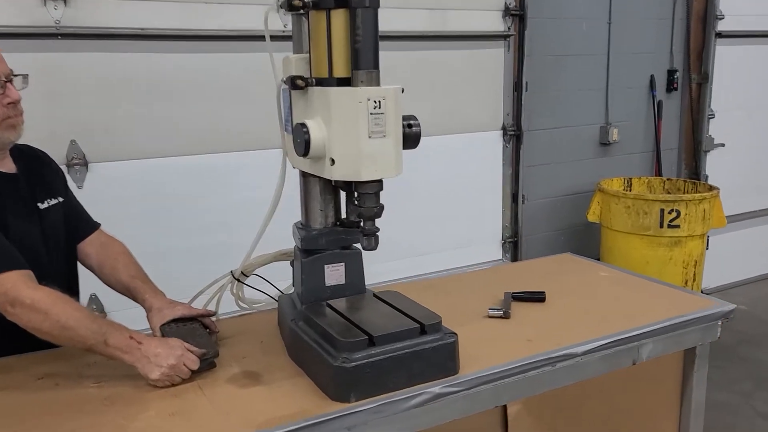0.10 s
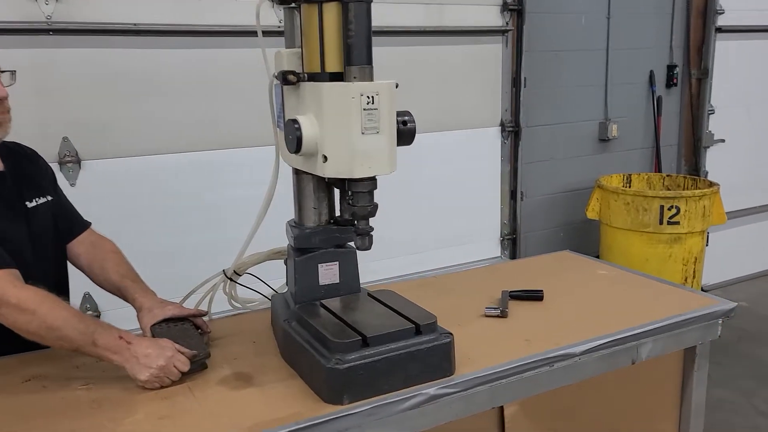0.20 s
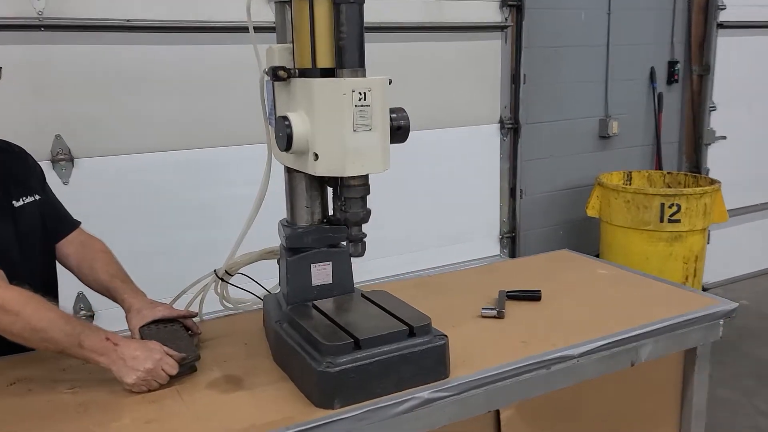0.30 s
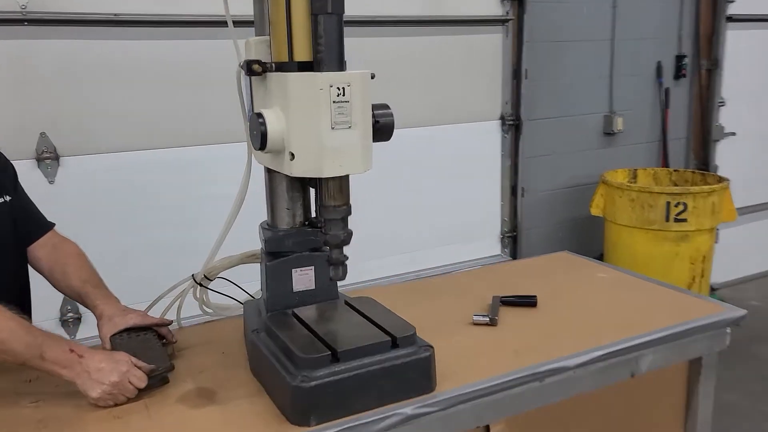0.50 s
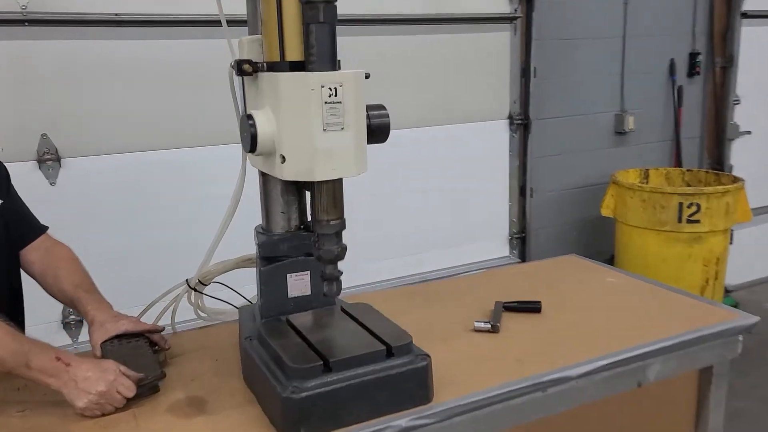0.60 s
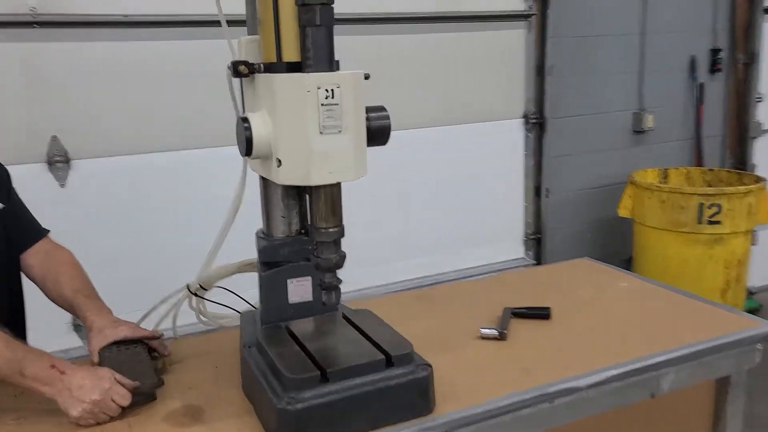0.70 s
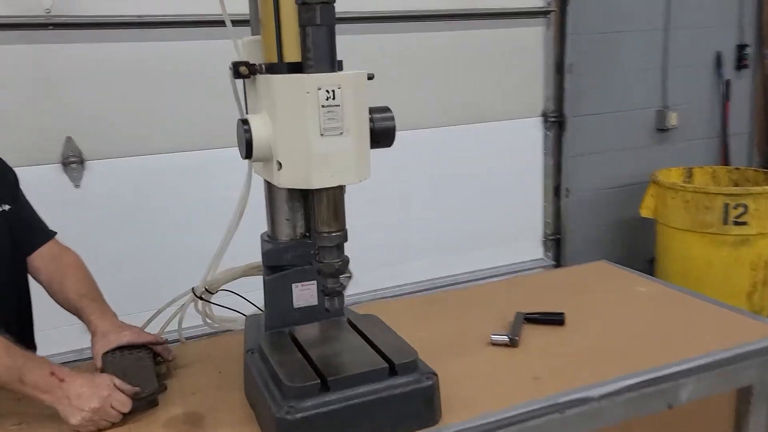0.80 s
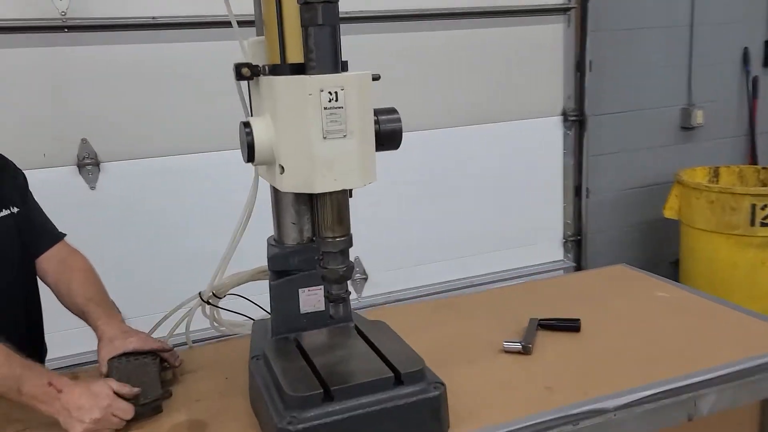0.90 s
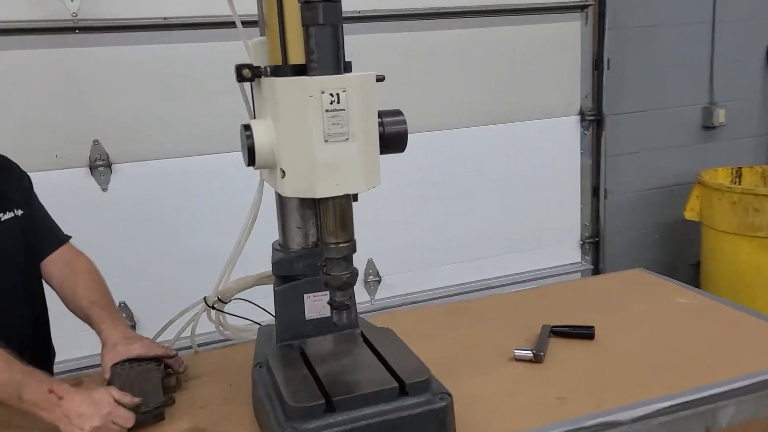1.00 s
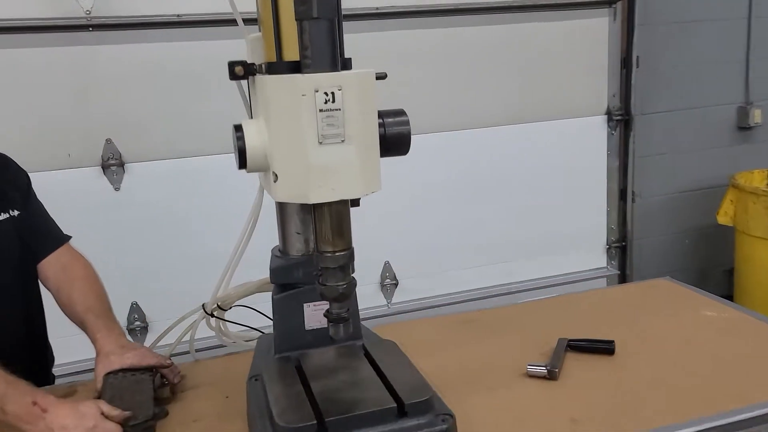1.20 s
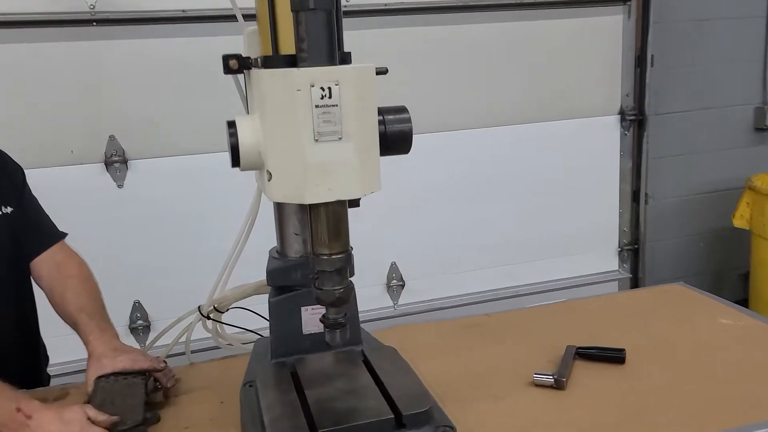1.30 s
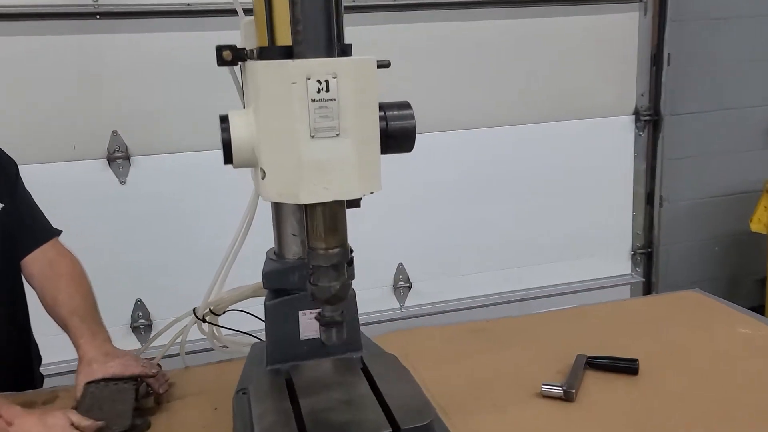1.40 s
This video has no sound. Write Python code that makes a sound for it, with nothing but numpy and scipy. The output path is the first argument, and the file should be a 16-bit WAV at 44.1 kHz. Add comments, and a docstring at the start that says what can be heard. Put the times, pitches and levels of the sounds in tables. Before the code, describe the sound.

A burst of compressed air and a dull thud from a pneumatic stamping press.

```python
"""A pneumatic stamping press makes one stroke on a bench in a large, hard-walled workshop.
At the stereo pair, the valve cracks open with a thin hiss, then air rushes out for two thirds of a
second, ringing the exhaust port, which points at the microphones. The ram lands with a dull, bouncing
thud and the hiss rings on in the hall over a low drone. A soft, dry knock follows, dead centre."""
import sys
import numpy as np
from scipy import signal
from scipy.fft import rfft, irfft
from scipy.io import wavfile

SR = 44100
rng = np.random.default_rng(int(sys.argv[2]) if len(sys.argv) > 2 else 0)


def master(y):
    """Save y as 16-bit WAV."""
    cut = np.clip(np.atleast_2d(y).T, -1, 1)
    pcm = np.round(cut * 32767)  # scale
    wavfile.write(sys.argv[1], SR, pcm.astype(np.int16))


N = 61740
TIME, HZ = np.arange(N) / SR, np.fft.rfftfreq(N, 1 / SR)

# room tone (frequency [Hz], relative level [dB])
ROOM_TONE = [(25, -7), (45, 1), (95, -3), (140, -6.5), (210, -1.5), (300, -29), (600, -25.5), (2000, -18.5),
             (6000, -32), (11000, -58), (15000, -64)]
# tones of the low drone (frequency [Hz], relative level [dB])
DRONE_TONES = [(95.2, 0), (124.5, -7)]
# low drone: motor hum, swelling near 1 s as the bench rumbles after the blow (time [s], level [dB])
DRONE_LEVEL = [(0, -49.5), (.14, -41.5), (.31, -45.5), (.37, -49.5), (.52, -42), (.8, -41.5), (.93, -37.5),
               (1.02, -35), (1.09, -48), (1.2, -44), (1.43, -46.5)]
# hiss of the previous stroke, still in the hall (frequency [Hz], relative level [dB])
LINGER_COLOUR = [(300, -1.5), (600, -16), (1000, 1.5), (2000, -1), (3000, -0.5), (4500, -5.5),
                 (7000, -17), (10000, -30), (12000, -47)]
# hall decay (frequency [Hz], t60 [s])
HALL_DECAY = [(150, 0.5), (500, 1.5), (1200, 2.2), (2300, 2.2), (4500, 2.2), (8000, 1.08), (12000, 0.66),
              (16000, 0.47)]
# strength of the reverberation (frequency [Hz], level [dB])
HALL_COLOUR = [(150, 8.5), (750, -3.5), (1200, 1), (1900, -2.5), (3000, -4), (5500, -4.5), (9000, -1.5),
               (12500, -5), (15500, -4)]
# likeness of the hall at the two microphones (frequency [Hz], correlation)
HALL_LIKENESS = [(150, 0.89), (650, .75), (950, 0.27), (1350, -0.65), (2100, 0.22), (4000, -0.11)]
# ring of the knock (frequency [Hz], relative level [dB], t60 [s])
KNOCK_RING = [(150, -3, .07), (270, -5, .025), (420, 0, .018), (1300, -12, .015)]
# modes of press and bench (frequency [Hz], relative level [dB], t60 [s])
BENCH_MODES = [(72, -8, 0.06), (131.3, -12.5, 0.45), (208.4, -8, 0.13), (277.4, 0, 0.068),
               (362.3, -3, 0.14), (414, -17, 0.063), (1002, -15, 0.15)]
# blows and bounces of the ram (time [s], level [dB], contact time [s])
RAM_BLOWS = [(0.7336, -9, 0.0024), (0.746, -11, 0.0045), (0.76, -23, 0.00053), (.988, -31.5, 0.0031),
             (1.021, -37, 0.006)]
# reflections off the bench and the door behind (delay [s], level [dB])
REFLECTIONS = [(.0023, -27.5), (.00698, -15), (0.0173, -18)]
# where the air sits in the stereo image (frequency [Hz], left minus right [dB])
AIR_BALANCE = [(250, -1), (700, -4.5), (1200, -.5), (2500, 1.5), (5500, 1), (9000, 7), (14000, 4.5)]
# likeness of the air at the two microphones (frequency [Hz], correlation)
AIR_LIKENESS = [(300, .95), (800, 1), (1700, .97), (2050, .5), (2500, .97), (3400, .85), (4200, .3),
                (4900, .65), (6000, .4), (9000, .55), (12300, .7), (15500, .6)]
# swell of the treble in the hiss (time [s], level [dB])
TREBLE_SWELL = [(.27, -1), (.37, -1.5), (.42, 1), (.52, -0.5), (.66, 0), (.74, -1.5), (.8, 2), (.885, 3),
                (.93, -2.5)]
# hiss of the barely open valve (time [s], level [dB])
SEEP_LEVEL = [(.09, -60), (.15, -45), (.175, -30.5), (.205, -23), (.228, -21), (.255, -16), (.31, -17),
              (.38, -32)]
# colour of that hiss (frequency [Hz], relative level [dB])
SEEP_SPECTRUM = [(400, -57), (640, -33), (900, -14.5), (1300, -16), (1700, -6.5), (2100, -6), (2600, 1.5),
                 (3200, -3.5), (4200, -40), (5400, -23), (6400, -10), (9200, -19.5), (11400, -23),
                 (13500, -26), (15700, -5)]
# exhaust port resonances (frequency [Hz], half width [Hz], early level [dB], late level [dB])
PORT_RESONANCES = [(786, 40, -39, -35), (902, 79, -32, -41), (1008, 104, -40, -29.5),
                   (1624, 350, -29.5, -26), (2490, 240, -23.5, -22.5), (2860, 150, -28, -23.5),
                   (3122, 89, -25, -29.5), (3524, 230, -30.5, -31), (4915, 170, -37, -34),
                   (6640, 50, -28.5, -72), (9180, 130, -31.5, -37), (12400, 580, -23.5, -28),
                   (15130, 410, -21.5, -24)]
# air flow through the open valve (time [s], relative level [dB])
VALVE_FLOW = [(.19, -45), (.235, -22), (.27, -3.5), (.32, -.5), (.38, 0), (.415, 0), (.5, -0.5), (.6, 0),
              (.72, -0.5), (.8, -2), (.878, -1), (.9, -6.5), (.925, -13), (.96, -17)]
# broad colour of the jet (frequency [Hz], relative level [dB])
JET_COLOUR = [(120, -38), (250, -17.5), (400, -7.5), (560, -12), (800, -5), (1250, -0.5), (2100, 3),
              (3300, 0), (4300, -2.5), (6000, -2.5), (7500, -3), (10500, -5), (13500, -1), (15800, -12)]


def amp(db):
    """Decibels to gain."""
    return 10 ** (np.asarray(db) / 20)


def unit(x):
    """Scales to rms 1."""
    return x / np.sqrt(np.mean(x ** 2) + 1e-20)


def read(points, hz=HZ):
    """Reads a table on a log-frequency axis."""
    f, value = np.transpose(points)
    return np.interp(np.log(hz + 1), np.log(f + 1), value)


def level(points):
    """Gain from a curve of (time [s], level [dB]), silent outside it."""
    return amp(np.interp(TIME, *np.transpose(points), left=-np.inf, right=-np.inf))


def wander(seconds):
    """Smooth random drift of rms 1 that changes over the given time."""
    return unit(irfft(rfft(rng.standard_normal(N)) * np.exp(-(HZ * seconds) ** 2) * (HZ > 0), N))


def pan(db):
    """Microphone gains for a left minus right level difference."""
    return amp(np.array([db, -db]).reshape(2, -1) / 2)


def noise(colour, likeness):
    """Coloured noise of rms 1 at two microphones with the given likeness."""
    left, other = rfft(rng.standard_normal((2, N)))
    likeness = np.clip(likeness, -1, 1)
    right = likeness * left + np.sqrt(1 - likeness ** 2) * other
    return unit(irfft(np.array([left, right]) * colour, N))


def strike(modes, start, db, contact_s):
    """Damped modes set ringing by a short push."""
    t = np.maximum(TIME - start, 0)
    ring = sum(amp(mode_db - 60 * t / t60) * np.sin(2 * np.pi * hz * t) for hz, mode_db, t60 in modes)
    return amp(db) * ring * (1 - np.exp(-t / contact_s))


def workshop(waver_db=1.2, drift_rad=0.72, fade_db_per_s=22):
    """Room tone, a low drone of motor hum and bench rumble, and the previous stroke's dying hiss."""
    drone = 0
    for hz, db in DRONE_TONES:
        gain = amp(db + waver_db * wander(0.063))
        drone += gain * np.sin(2 * np.pi * (hz * TIME + rng.random()) + drift_rad * wander(0.1))
    drone *= np.sqrt(2) * level(DRONE_LEVEL)
    room = amp(-43.5) * noise(amp(read(ROOM_TONE)), likeness=0.99 / (1 + (HZ / 700) ** 2))
    linger = amp(-42.5 - fade_db_per_s * TIME) * noise(amp(read(LINGER_COLOUR)), read(HALL_LIKENESS))
    return pan(db=-1) * (room + drone) + linger


def hall(x, delay_s=0.019):
    """Dense reflections from the distant hard walls, each band dying at its own speed."""
    hz, t, bands = signal.stft(noise(1, read(HALL_LIKENESS)), SR, nperseg=256)
    t60 = read(HALL_DECAY, hz)[:, None]
    decay = amp(read(HALL_COLOUR, hz)[:, None] - 60 * t / t60)
    equal_energy = np.sqrt(2 * np.log(1000) / (t60 * SR))
    tail = signal.istft(bands * decay * equal_energy, SR, nperseg=256)[1][:, :N]
    fade_in = np.clip(TIME / delay_s - .5, 0, 1)
    return signal.fftconvolve(x[None], tail * fade_in, axes=1)[:, :N]


def knock():
    """A soft, quickly damped knock, the same in both microphones."""
    return strike(KNOCK_RING, start=1.3155, db=-25.5, contact_s=.0004)


def ram():
    """Just right of centre, the ram lands, bounces and settles, shaking press and bench."""
    return pan(db=-3) * sum(strike(BENCH_MODES, *blow) for blow in RAM_BLOWS)


def air_at_mics(colour, right_late_s=0.00023):
    """Air noise arrives direct and off nearby surfaces, at the left microphone first."""
    echoes = 1 + sum(amp(db) * np.exp(-2j * np.pi * HZ * delay) for delay, db in REFLECTIONS)
    arrival = np.exp(-2j * np.pi * np.outer([0, right_late_s], HZ))
    return noise(echoes * pan(read(AIR_BALANCE)) * arrival * colour, read(AIR_LIKENESS))


def shimmer(x, above_hz=6800):
    """The top of the hiss swells and sags."""
    treble = irfft(rfft(x) / (1 + (above_hz / (HZ + 1)) ** 8), N)
    return x + treble * (amp(np.interp(TIME, *np.transpose(TREBLE_SWELL))) - 1)


def valve_seep(split_hz=4200, treble_late_s=0.028):
    """A thin hiss as the valve cracks open; its treble comes a little later."""
    hiss = air_at_mics(amp(read(SEEP_SPECTRUM)))
    treble = irfft(rfft(hiss) * (HZ > split_hz), N)
    return level(SEEP_LEVEL) * (hiss - treble) + level(np.add(SEEP_LEVEL, [treble_late_s, 0])) * treble


def exhaust_port(flow, midpoint_s=0.49, shift_s=0.44, waver_db=1.5):
    """The flow rings the port's resonances, whose balance shifts during the stroke."""
    progress = np.clip((TIME - midpoint_s) / shift_s + .5, 0, 1)
    ring = 0
    for hz, width, early_db, late_db in PORT_RESONANCES:
        gain = amp(early_db + (late_db - early_db) * progress + waver_db * wander(0.03))
        ring += gain * air_at_mics(1 / (1 + ((HZ - hz) / width) ** 2))
    return shimmer(flow * ring)


def air_jet(flow):
    """The escaping jet makes a broad hiss that follows the flow."""
    return shimmer(flow * amp(-18.5) * air_at_mics(amp(read(JET_COLOUR))))


def scene(flutter_db=0.52):
    """One stroke; the port beams at the microphones and stirs the hall less than the jet."""
    flow = level(VALVE_FLOW) * amp(flutter_db * wander(0.017))
    jet = air_jet(flow)
    port = exhaust_port(flow) + valve_seep()
    thud = ram()
    into_hall = jet + amp(-16.5) * port + amp(-11) * thud
    return jet + port + thud + knock() + hall(into_hall[1]) + workshop()


def record(dry, edge_hz=15900):
    """Both microphones pass through the recorder's band limit."""
    lowpass = signal.firwin(511, edge_hz, window=("kaiser", 9), fs=SR)
    return signal.oaconvolve(dry, lowpass[None], "same")


dry = scene()
out = record(dry)
master(out)
```